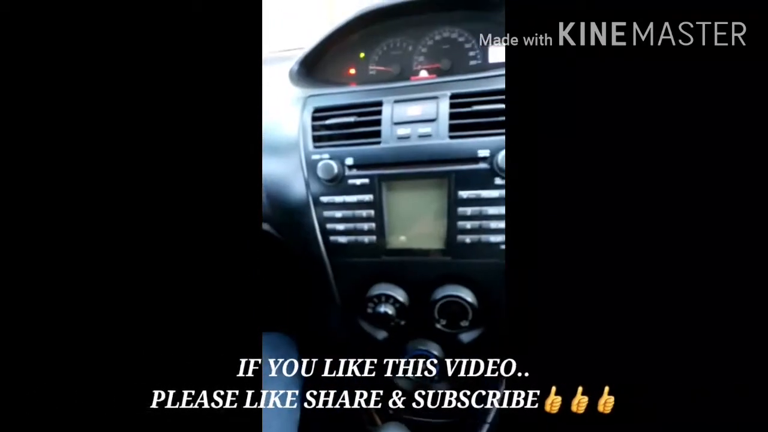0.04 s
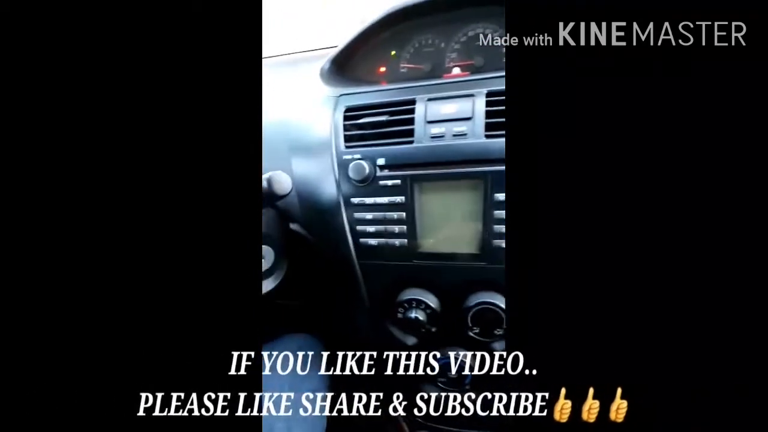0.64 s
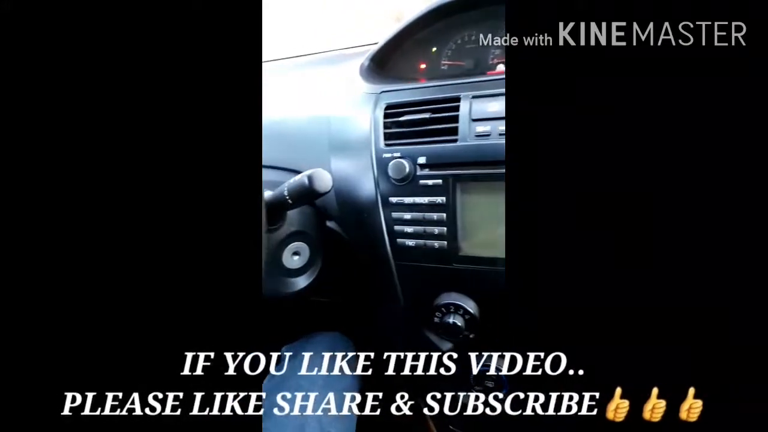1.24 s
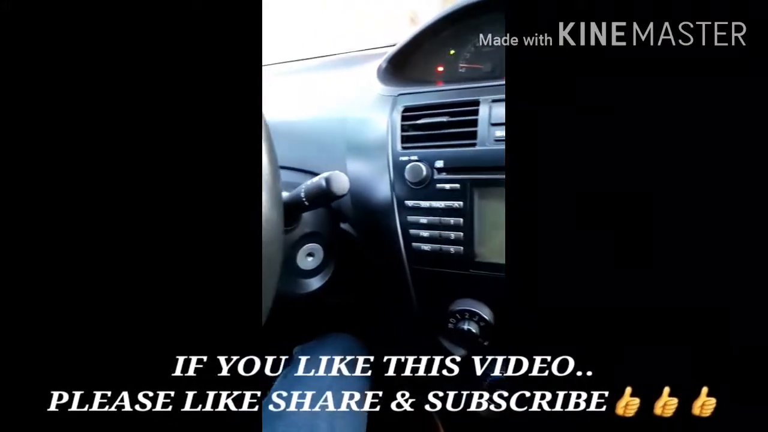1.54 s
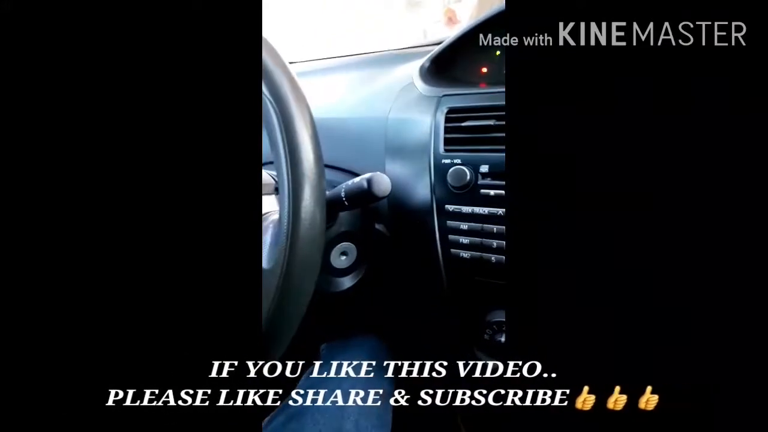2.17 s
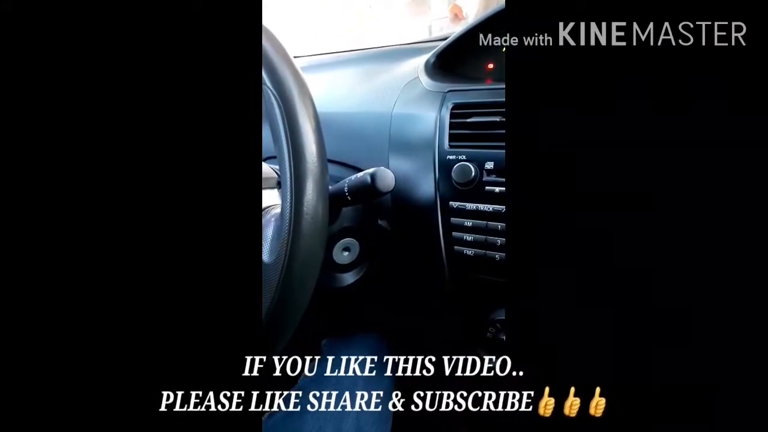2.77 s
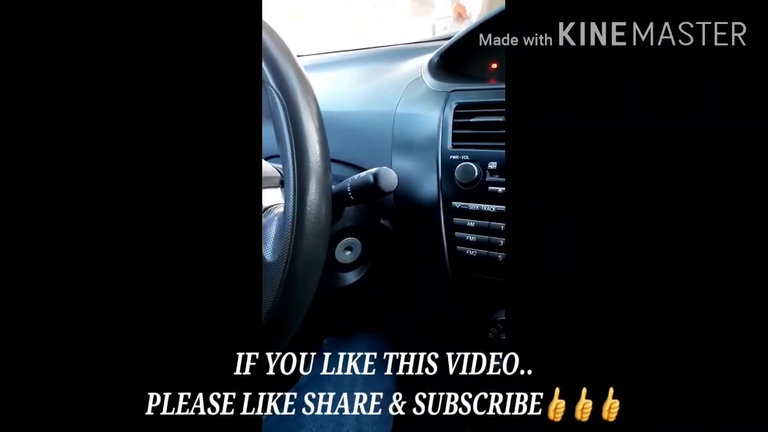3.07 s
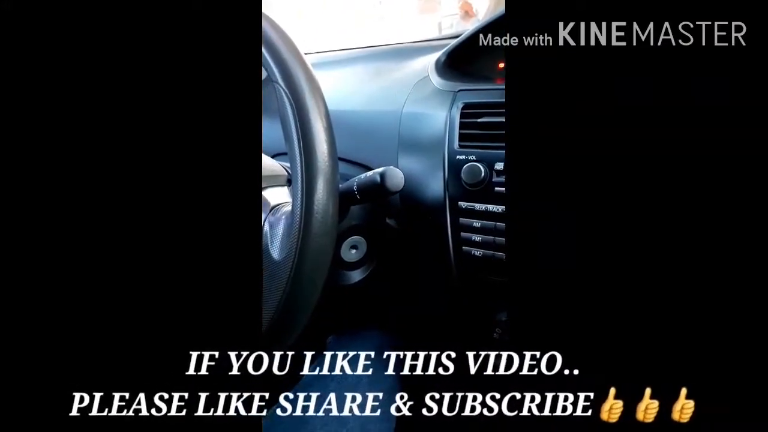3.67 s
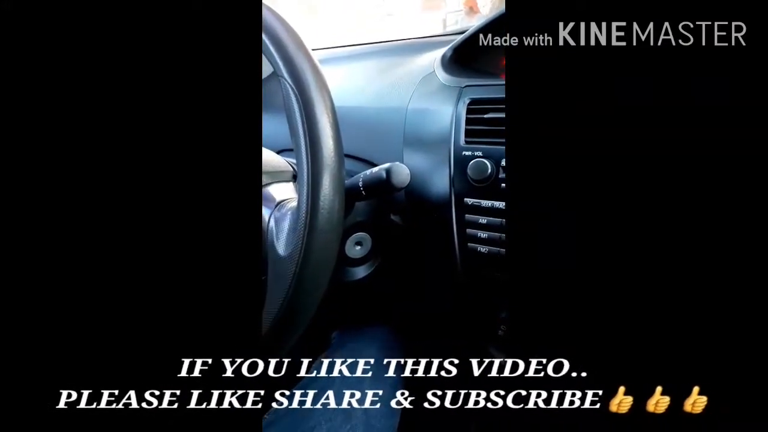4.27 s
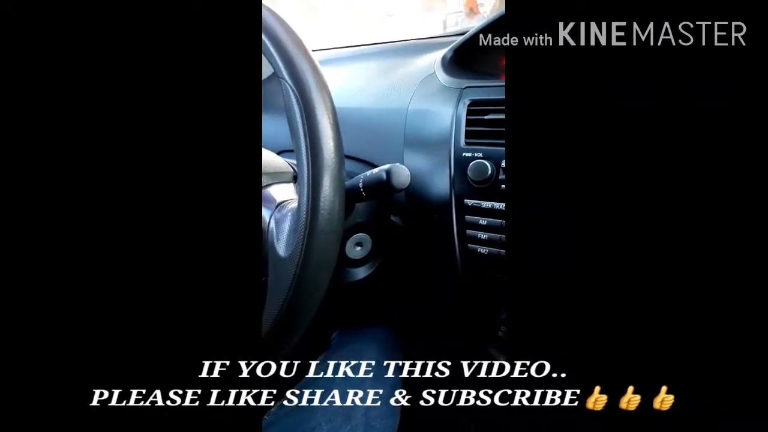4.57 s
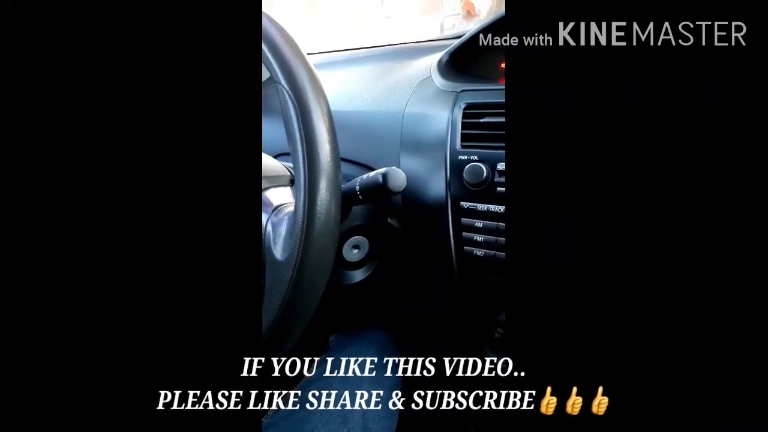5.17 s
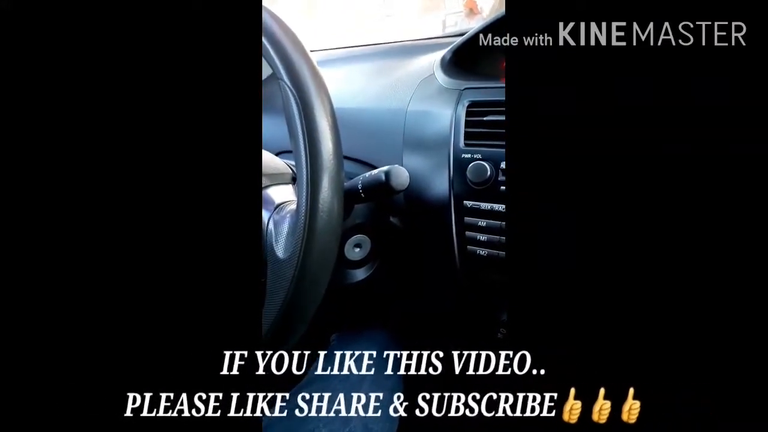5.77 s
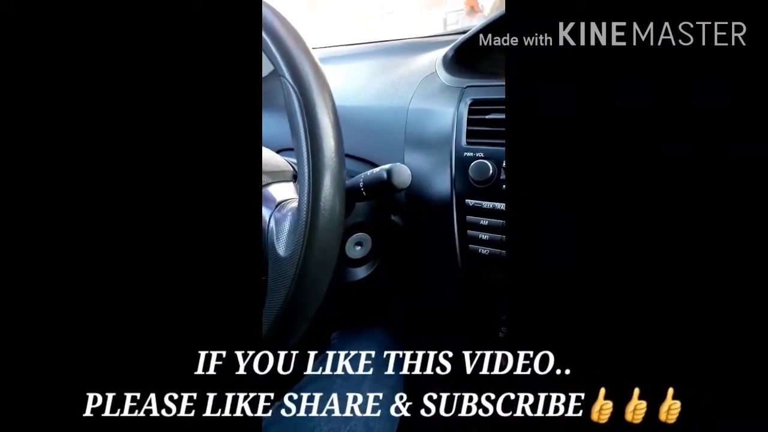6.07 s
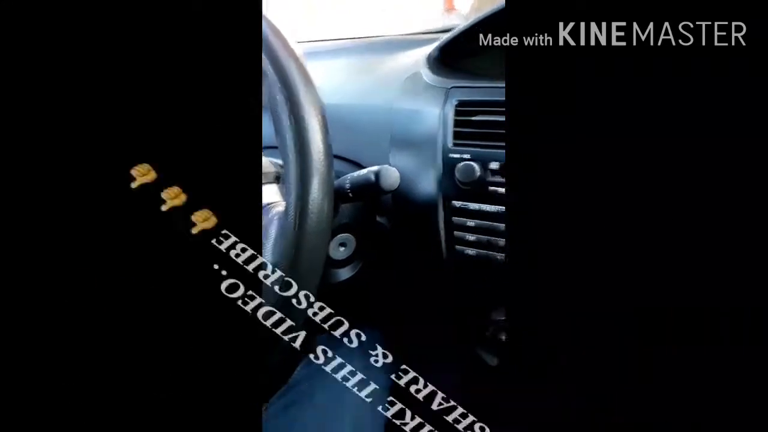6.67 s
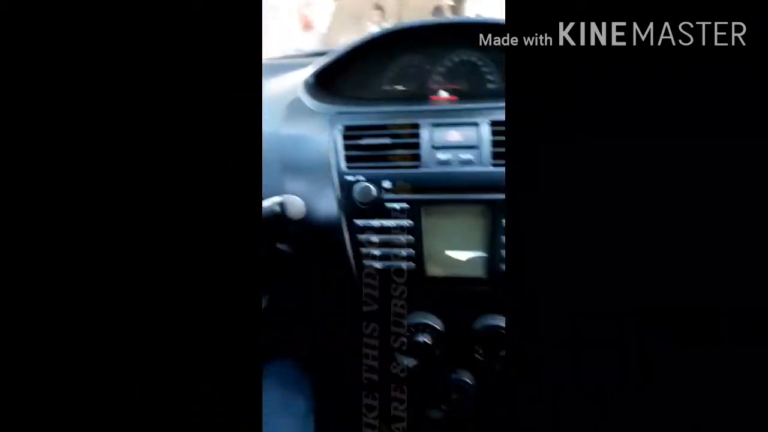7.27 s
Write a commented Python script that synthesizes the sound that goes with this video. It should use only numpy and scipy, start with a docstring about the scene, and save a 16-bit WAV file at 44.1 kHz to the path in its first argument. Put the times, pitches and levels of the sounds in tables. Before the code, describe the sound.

A small car's engine idles softly from the start, a low hum and rumble with faint clatter, heard inside the padded cabin over muffled street noise. At about 0.8 seconds plastic trim creaks briefly. A sleeve brushes past, and hanging keys jingle close by from 1.8 to 2.2 seconds, then shiver faintly. Another vehicle drones quietly outside, swelling around 4 and 6 seconds. At 5.8 seconds the key clicks in the ignition. The lock scrapes round and snaps at 6.1 seconds with a dull thud, by far the loudest moment. The engine dies away within about half a second while the keys clink lightly. A few faint taps follow in the quiet cabin, then a hollow knock at 7.2 seconds and a soft, low handling rumble at the end, around 7.4 seconds.

```python
"""Switching off a small car

A four-cylinder engine hums, rumbles and clatters through the cabin while another vehicle drones outside.
A sleeve brushes past, trim creaks, and the keys strike each other and ring. The ignition lock scrapes
round, its latch snaps loudly, and the engine coasts down. The keys swing, and a few light taps, a
hollow knock and a low handling rumble follow in the quiet cabin."""
import sys
import numpy as np
from scipy import signal
from scipy.fft import rfft, irfft
from scipy.io import wavfile

SR = 44100
rng = np.random.default_rng(int(sys.argv[2]) if len(sys.argv) > 2 else 0)


def put_to_file(sound):
    """Save the sound as 16-bit audio at rate SR, in the file named by the first command-line argument."""
    columns = np.atleast_2d(sound).T  # one column per channel
    safe = np.clip(columns, -1, 1)
    whole_steps = np.round(safe * 32767)
    wavfile.write(sys.argv[1], SR, whole_steps.astype(np.int16))


N = 327792
TIME = np.arange(N) / SR

# decay of the padded cabin: freq_hz, t60_s
CABIN_DECAY = [(100, 0.25), (400, .115), (1500, 0.11), (5000, .07), (15000, .05)]
# muffled street wash: freq_hz, density_db
STREET_SPECTRUM = [(25, -19), (60, -8.5), (100, -4), (145, 0), (200, -8.5), (320, -10), (470, -16),
                   (1050, -24), (1400, -32), (2100, -38), (4000, -27.5), (8100, -32), (9500, -44),
                   (15500, -34.5)]
# the vehicle outside eases off and pulls away: time_s, firing_hz, level_db
PASSING_DRIVE = [(0, 44.83, -55.5), (3.25, 45.08, -53.5), (3.5, 44.1, -46.5), (4.25, 41.52, -42.5),
                 (5.1, 38.6, -53), (5.95, 40.46, -43), (6.55, 46.65, -53.5), (6.9, 48.34, -60),
                 (7.43, 46.1, -57)]
# harmonics of its drone: firing_multiple, level_db
DRONE_ORDERS = [(2, -11), (3, -5), (4, -4.5), (5, -9), (6, -13), (7, -13.5), (8, -20.5)]

# harmonics of the idle: firing_multiple, level_db
IDLE_ORDERS = [(1, -71.5), (2, -48.5), (3.5, -61), (4, -55), (4.5, -55), (5.5, -58), (6, -49.5), (7, -54.5),
               (9, -58.5), (11, -52.5), (12, -54.5), (13, -56.5), (15, -54.5), (18, -62.5)]
# its third and fifth orders, which sit on cabin resonances: time_s, third_db, fifth_db
IDLE_BOOM = [(0, -46, -50), (.45, -43, -53), (.65, -44.5, -38.5), (1.15, -43, -39), (1.6, -53.5, -48.5),
             (3.0, -57.5, -52.5), (4.5, -43.5, -41), (6.1, -53, -48.5)]
# low rumble of the body panels: freq_hz, density_db
RUMBLE_SPECTRUM = [(30, -34), (55, -23), (85, -6.5), (110, 0), (135, 3), (170, -4.5), (215, -11), (260, -6),
                   (330, -4), (400, -8.5), (450, -12), (570, -13), (700, -27.5), (1000, -65.5)]
# clatter and hiss through the bulkhead: freq_hz, density_db
CLATTER_SPECTRUM = [(300, 2), (700, 1.5), (1100, 1), (1400, -3), (1850, -5.5), (2100, -13), (2500, -18.5),
                    (3200, -14), (4000, -9.5), (5200, -20), (8300, -29.5), (9600, -42.5), (15000, -31)]
# bulkhead resonances: centre_hz, width_hz, boost_db
BULKHEAD_PEAKS = [(780, 24, 2.2), (970, 72, 3.3), (1070, 65, 2), (1270, 50, 2.8), (1563, 110, 3),
                  (2850, 130, 3), (3980, 100, 2), (5450, 180, 4), (7410, 150, 9.5)]

# sleeve strokes: peak_s, level_db, rise_s, fall_s
SLEEVE_STROKES = [(.3, -71, .6, .5), (.8, -60, .04, 0.096), (.99, -64, 0.069, .06),
                  (1.78, -53.5, 0.26, 0.43), (7.33, -68.5, 0.13, 0.29)]
# brushing cloth: freq_hz, density_db
CLOTH_SPECTRUM = [(600, -17), (2000, 2), (4500, 6), (6500, -0.5), (8200, 3), (9800, -13), (15000, -2.5)]
# a low handling rumble swells as a phone is turned: peak_s, level_db, rise_s, fall_s
HANDLING_SWELLS = [(7.42, -50, .1, .2)]
# dull colour of that rumble: freq_hz, density_db
HANDLING_SPECTRUM = [(60, -25), (150, -0.5), (240, -1.5), (330, -14), (600, -17), (1100, -28), (2200, -33),
                     (4000, -44)]
# plastic trim creaking in short slips: start_s, level_db
TRIM_SLIPS = [(.744, -43), (.755, -37), (0.7729, -30.5), (.789, -33), (.798, -30), (.801, -28.5),
              (.81, -41)]
# colour of a slip: freq_hz, density_db
TRIM_SPECTRUM = [(900, -24), (2500, -2.5), (4000, -3.5), (6000, -0.5), (8000, -1), (10000, -24),
                 (15000, -20)]
# ring of the trim: pitch_hz, level_db, t60_s
TRIM_RING = [(3680, -7, 0.033), (5340, -7, 0.017), (6070, 2.5, 0.019)]

# a hollow knock and its rebound: start_s, level_db
PANEL_KNOCKS = [(7.156, -32.5), (7.176, -46)]
# colour of the knock: freq_hz, density_db
PANEL_SPECTRUM = [(250, -23.5), (450, -3), (750, 5), (1100, -6), (1350, -22), (3000, -28), (5500, -27),
                  (7200, -17), (10000, -43), (15000, -34)]
# ring of the hollow panel: pitch_hz, level_db, t60_s
PANEL_RING = [(423.4, -7, 0.082), (519, -9.5, 0.12), (770, 3, 0.032), (891, -22, 0.28), (1010, -1.5, 0.052),
              (1740, -18, 0.054)]

# the hanging keys shiver in short spells: peak_s, level_db
KEY_SHIVERS = [(.98, -60), (2.32, -67), (2.55, -70), (2.8, -69), (3.32, -75), (3.53, -70)]
# their thin sizzle: freq_hz, density_db
SHIVER_SPECTRUM = [(4000, -29.5), (5800, -14), (6800, -17), (7700, 0), (8800, 1), (9500, -20), (15000, -24)]
# keys clinking: start_s, level_db, key_number
KEY_CLINKS = [(1.005, -42, 1), (1.017, -43, 4), (1.779, -36.5, 1), (1.802, -25.5, 1), (1.819, -32, 1),
              (1.828, -22.5, 2), (1.838, -37, 1), (1.91, -40, 3), (1.986, -34, 3), (1.997, -42, 3),
              (2.033, -38.5, 1), (2.0524, -17, 3), (2.185, -23, 4), (6.199, -32, 5), (6.231, -38.5, 5),
              (6.255, -38, 5), (6.259, -39, 5)]
# bright attack of a clink: freq_hz, density_db
CLINK_SPECTRUM = [(400, -41.5), (1100, -3), (2500, -2.5), (4300, 2), (5300, 4), (6600, -3), (8100, 7.5),
                  (9700, -11.5), (12000, -7.5), (15000, -7)]
# how keys 1 to 5 take a blow: contact_t60_s, tilt_db_per_octave, ring_db
KEY_ATTACKS = [(.025, 3, 3.5), (.018, 4, -0.5), (0.047, 3.5, -5), (0.034, 2.5, 1), (0.019, 1, 2)]
# ring of each key: key_number, pitch_hz, level_db, t60_s
KEY_RING = [(1, 4500, -0.5, .02), (1, 5300, -3, 0.018), (1, 7850, 2.5, .022), (1, 8120, -1.5, 0.018),
            (1, 14500, -6.5, .012), (2, 4700, -2.5, .025), (2, 4200, -17, .025), (2, 6800, -5, 0.048),
            (2, 7950, -4, .025), (2, 10800, -5, 0.013), (2, 14900, 8, .012), (3, 1340, -4, 0.014),
            (3, 2080, 0, 0.016), (3, 2770, -7.5, 0.057), (3, 3970, -3.5, 0.11), (3, 5500, -15, 0.034),
            (3, 5680, -12, 0.059), (3, 6510, -9.5, .035), (3, 8700, -3.5, 0.035), (3, 8700, 3.5, 0.036),
            (3, 11540, -1.5, 0.041), (3, 13900, -1, 0.034), (4, 4177, 1.5, 0.026), (4, 4880, -19.5, 0.2),
            (4, 7790, 4.5, .03), (4, 8040, -5, 0.025), (4, 9500, -3.5, 0.023), (4, 16000, -31, .035),
            (5, 2000, -18, 0.015), (5, 2900, -4, 0.017), (5, 3160, 4.5, 0.014), (5, 4280, -0.5, 0.026),
            (5, 7600, -17, .04)]

# the key pressed home: start_s, level_db, t60_s, tilt_db_per_octave, rise_s, ring_db
BARREL_PRESSES = [(5.8403, -20.5, 0.019, 0.5, 0.00041, -23.5)]
# click of the barrel: freq_hz, density_db
BARREL_SPECTRUM = [(400, -21), (1100, -13), (1650, 3), (2200, -9), (2700, 2), (3400, 0), (4000, -6),
                   (5200, -3.5), (6200, -20), (7800, -8), (9500, -31), (15000, -29)]
# scrapes and taps on the lock and its plastic shroud: start_s, level_db, t60_s, tilt_db_per_octave
LOCK_SCRAPES = [(5.925, -32, 0.098, 2.5), (5.951, -36.5, .075, -5), (6.042, -32.5, 0.064, -1.5),
                (6.067, -16, .055, -1.5), (6.073, -11.5, 0.051, -3), (6.108, -8.5, 0.073, -1.5),
                (6.131, -19, .05, -2), (6.291, -37.5, 0.12, -4), (6.336, -34, 0.063, -4),
                (6.606, -45.5, 0.054, 0), (6.643, -36.5, 0.041, -1.5), (6.882, -47, .014, 0),
                (7.416, -41, .02, -1)]
# colour of the lock: freq_hz, density_db
LOCK_SPECTRUM = [(100, -16.5), (300, -4), (600, 3), (950, -1), (1600, -1.5), (2300, -8.5), (3000, -6),
                 (3850, -1.5), (5800, -5.5), (7700, -2.5), (9700, -15.5), (12000, -17.5), (15000, -15.5)]
# ring of the shroud: pitch_hz, level_db, t60_s
SHROUD_RING = [(286, -9, .16), (540, -8.5, 0.063), (690, -8.5, .08), (867, -7, .11), (1003, -2.5, .08),
               (1140, -5, .09), (1392, -1, .085), (1600, -3.5, .08), (1700, -4.5, .08), (2840, -9.5, .06),
               (3200, -11.5, .07), (3800, -4, .07), (4060, -4, 0.077), (5080, -4.5, .07), (6800, -9, .06),
               (7600, -7, .06)]
# the sprung latch snaps home: start_s, level_db, t60_s, tilt_db_per_octave, rise_s, ring_db
LATCH_SNAPS = [(6.0972, -6.5, 0.048, 2.5, .002, -2)]
# ring of the latch: pitch_hz, level_db, t60_s
LATCH_RING = [(1696, -1, 0.064), (3660, -2, 0.031), (3940, 2, 0.059), (4980, -2, .055), (6880, -8.5, 0.054),
              (7100, -5, .04), (7500, -9.5, .06), (7800, -5.5, 0.029)]
# the steering column takes the blow: start_s, level_db
COLUMN_THUDS = [(6.072, -29.5), (6.109, -13.5)]
# the column's dull body: freq_hz, density_db
COLUMN_SPECTRUM = [(40, -24.5), (120, -13), (190, -7), (260, 3.5), (350, -4), (500, -3.5), (750, -10),
                   (1100, -8), (1400, -15.5), (2500, -37.5), (8000, -60.5)]


def amp(db):
    """Decibels to gain."""
    return 10 ** (np.asarray(db) / 20)


def unit(x):
    """Scales to an rms of one."""
    return x / np.sqrt(np.mean(x ** 2) + 1e-20)


def curve(rows, column=1):
    """One column of a table as straight ramps over time."""
    columns = np.transpose(rows)
    return np.interp(TIME, columns[0], columns[column])


def at_hz(points, hz):
    """A table's value at hz, on straight lines over log frequency."""
    freqs, values = np.transpose(points)
    return np.interp(np.log(hz + 1), np.log(freqs), values)


def resonance(hz, centre_hz, width_hz, boost_db):
    """A bell-shaped boost, in dB over frequency."""
    return boost_db / (1 + (2 * (hz - centre_hz) / width_hz) ** 2)


def tone(cycles, db):
    """A sine of the given rms level that follows a count of cycles."""
    return np.sqrt(2) * amp(db) * np.sin(2 * np.pi * (cycles + rng.random()))


def noise(spectrum, size=N, tilt=0, peaks=()):
    """Unit-rms coloured noise with resonant peaks, tilted in dB per octave above 300 Hz."""
    hz = np.fft.rfftfreq(size, 1 / SR)
    db = at_hz(spectrum, hz) + tilt * np.log2(np.maximum(hz, 300) / 300)
    db += sum(resonance(hz, *peak) for peak in peaks)
    return unit(irfft(amp(db) * np.exp(2j * np.pi * rng.random(len(hz))), size))


def wander(rate_hz):
    """Smooth random drift of unit rms, up to about rate_hz."""
    hz = np.fft.rfftfreq(N, 1 / SR)
    return unit(irfft(rfft(rng.standard_normal(N)) * np.exp(-(hz / rate_hz) ** 2), N))


def swells(rows):
    """Gain of soft movements: each builds smoothly to its peak and dies away."""
    return sum(amp(db) * np.exp(-np.where(TIME < peak, ((TIME - peak) / rise) ** 2, (TIME - peak) / fall))
               for peak, db, rise, fall in rows)


def hits(rows, spectrum, modes=(), size=16384, crackle_db=3, grain_s=.0008):
    """Each contact is a brief burst of crackle that sets the object's modes ringing."""
    t, out = np.arange(size) / SR, np.zeros(N)
    for start_s, db, t60_s, tilt, rise_s, ring_db in rows:
        onset = 1 - np.exp(-t / rise_s)
        envelope = onset * amp(-60 * t / t60_s)
        # the parts chatter against each other while they touch
        chatter = amp(crackle_db * np.interp(t / grain_s, np.arange(size), rng.standard_normal(size)))
        burst = unit(noise(spectrum, size, tilt) * envelope * chatter) * np.sqrt(np.mean(envelope ** 2))
        ring = sum(amp(level - 60 * t / decay) * np.sin(2 * np.pi * (hz * t + rng.random()))
                   for hz, level, decay in modes)
        hit = amp(db) * (burst + amp(ring_db) * onset * ring)
        slot = out[round(start_s * SR):][:size]
        slot += hit[:len(slot)]
    return out


def cabin_reverb(x, size=16384, first_echo_s=.0027):
    """The padded cabin gives a short tail whose treble dies first."""
    hz, t, bands = signal.stft(rng.standard_normal(size), SR, nperseg=256)
    decay = amp(-60 * t / at_hz(CABIN_DECAY, hz)[:, None])
    tail = signal.istft(bands * decay, SR, nperseg=256)[1]
    tail *= np.arange(len(tail)) > first_echo_s * SR
    return signal.fftconvolve(x, tail / np.linalg.norm(tail))[:N]


def street(waver_db=2.5, roughness=.3, wash_db=-59):
    """A vehicle outside eases off and pulls away again, over the muffled wash of the street."""
    firing_hz, level_db = curve(PASSING_DRIVE), curve(PASSING_DRIVE, column=2)
    firings = np.cumsum(firing_hz) / SR
    drone = np.zeros(N)
    for multiple, db in DRONE_ORDERS:
        # the air in the cabin favours this range
        boom_db = resonance(multiple * firing_hz, centre_hz=160, width_hz=36, boost_db=3.5)
        harmonic = tone(multiple * firings, level_db + db + boom_db + waver_db * wander(6.8))
        drone += harmonic * (1 + roughness * wander(30))
    return drone + amp(wash_db) * noise(STREET_SPECTRUM)


def engine(firing_hz=23.12, hunt=.004, waver_db=1.65, pulley_hz=1560,
           cut_s=6.13, coast_s=1.0, idle_db=-1, fade_db_per_s=124):
    """Firings hum through the body, shake panels and pump the clatter; once cut, it all winds down."""
    since_cut = np.maximum(TIME - cut_s, 0)
    speed = np.maximum(1 - since_cut / coast_s, 0)
    firings = np.cumsum(firing_hz * speed * (1 + hunt * wander(3.09))) / SR  # two per turn of the crank
    hum = tone(3 * firings, curve(IDLE_BOOM)) + tone(5 * firings, curve(IDLE_BOOM, column=2))
    for multiple, db in IDLE_ORDERS:
        hum += tone(multiple * firings, db + waver_db * wander(5.7))
    # the panels are shaken twice a firing, the two shakes unequal in strength
    throb = np.cos(2 * np.pi * 2 * firings) + .37 * np.cos(2 * np.pi * firings)
    rumble = unit(noise(RUMBLE_SPECTRUM) * (1 + .16 * throb) * amp(wander(13)))
    clatter = noise(CLATTER_SPECTRUM, peaks=BULKHEAD_PEAKS) * (1 + .051 * throb) * amp(.4 * wander(12))
    whine = tone(firings * pulley_hz / firing_hz, db=-67) * wander(49)  # a belt-driven pulley
    running = hum + whine + amp(-40) * rumble + amp(-51) * clatter
    return amp(idle_db - fade_db_per_s * since_cut) * running


def handling(grain_db=1.5, slip_t60_s=.012, tilt=1, rise_s=.0005, ring_db=-6):
    """A sleeve brushes past with a fine grain, a low handling rumble swells, and the trim creaks."""
    sleeve = swells(SLEEVE_STROKES) * unit(noise(CLOTH_SPECTRUM) * amp(grain_db * wander(120)))
    rumble = swells(HANDLING_SWELLS) * noise(HANDLING_SPECTRUM)
    slips = [(s, db, slip_t60_s, tilt, rise_s, ring_db) for s, db in TRIM_SLIPS]
    return sleeve + rumble + hits(slips, TRIM_SPECTRUM, TRIM_RING)


def knocks(t60_s=.053, tilt=.5, rise_s=.007, ring_db=3):
    """A hollow panel is bumped: a soft attack and a boxy ring."""
    bumps = [(s, db, t60_s, tilt, rise_s, ring_db) for s, db in PANEL_KNOCKS]
    return hits(bumps, PANEL_SPECTRUM, PANEL_RING)


def jingle(count=7, from_s=1.7, to_s=2.36, level_db=-48, spread_db=1.5):
    """Faint chance contacts among the first four keys, as rows: start_s, level_db, key_number."""
    slot_s = (to_s - from_s) / count
    return [(from_s + slot_s * (k + when), level_db - spread_db * (2 * softness - 1), 1 + k % 4)
            for k, (when, softness) in enumerate(rng.random((count, 2)))]


def keys(rise_s=.00049, full_blow_db=-20.5, ring_growth=.3, flicker_db=6):
    """Keys of different sizes clink, lighter touches ringing less, and shiver as they hang."""
    spells = swells([(s, db, .053, .054) for s, db in KEY_SHIVERS])  # rise_s, fall_s
    out = spells * unit(noise(SHIVER_SPECTRUM) * amp(flicker_db * wander(70)))
    contacts = list(KEY_CLINKS) + jingle()
    for key, (t60_s, tilt, ring_db) in enumerate(KEY_ATTACKS, 1):
        modes = [mode for owner, *mode in KEY_RING if owner == key]
        blows = [(s, db, t60_s, tilt, rise_s, ring_db + ring_growth * (db - full_blow_db))
                 for s, db, struck in contacts if struck == key]
        out += hits(blows, CLINK_SPECTRUM, modes)
    return out


def ignition(rise_share=.039, ring_db=-4.5, ring_growth=.52,
             thud_t60_s=.11, thud_tilt=.4, thud_rise_s=.006):
    """The key is pressed home, the lock scrapes round, its latch snaps, and the steering column thuds."""
    press = hits(BARREL_PRESSES, BARREL_SPECTRUM, SHROUD_RING)
    # longer scrapes start more softly, harder ones ring more
    scrapes = [(s, db, t60_s, tilt, rise_share * t60_s, ring_db + ring_growth * db)
               for s, db, t60_s, tilt in LOCK_SCRAPES]
    turn = hits(scrapes, LOCK_SPECTRUM, SHROUD_RING)
    blows = [(s, db, thud_t60_s, thud_tilt, thud_rise_s, 0) for s, db in COLUMN_THUDS]
    thud = hits(blows, COLUMN_SPECTRUM, crackle_db=1)
    snap = hits(LATCH_SNAPS, LOCK_SPECTRUM, LATCH_RING)
    return press + turn + snap + thud


def scene(reverb_db=-10):
    """Close handling sounds and their reverb, over a bed of engine and street, in mono."""
    close = handling() + keys() + ignition() + knocks()
    bed = engine() + street()
    return (bed + close + amp(reverb_db) * cabin_reverb(close))[None]


def record(dry, cutoff_hz=15650):
    """Clips the peaks at full scale and cuts the very top of the treble."""
    lowpass = signal.firwin(401, cutoff_hz, window=("kaiser", 8), fs=SR)
    return signal.oaconvolve(np.clip(dry, -1, 1), lowpass[None], "same")


dry = scene()
out = record(dry)
put_to_file(out)
```